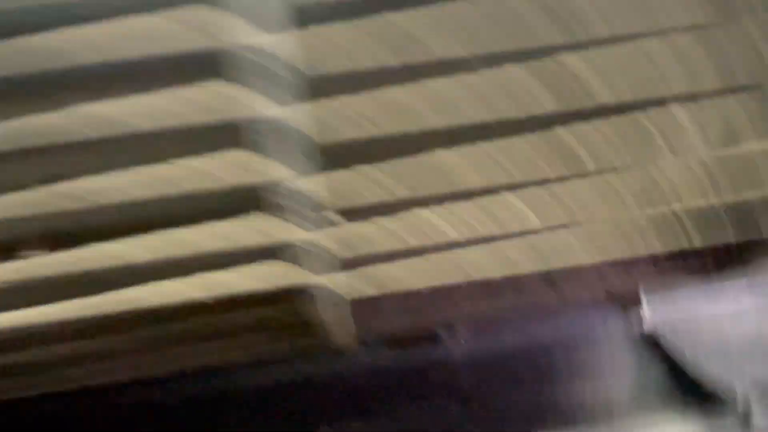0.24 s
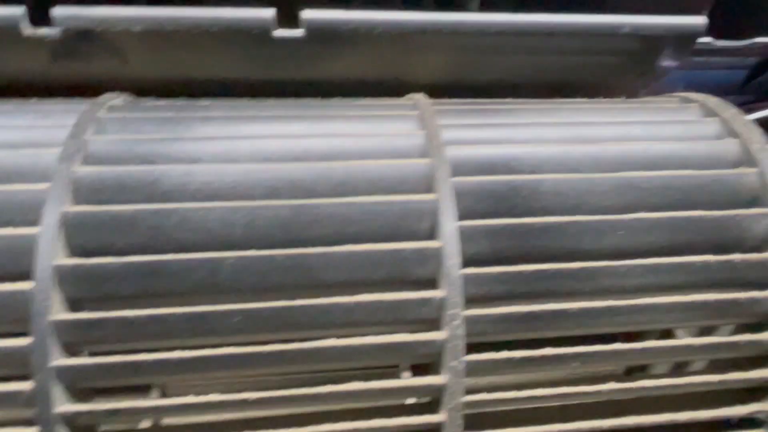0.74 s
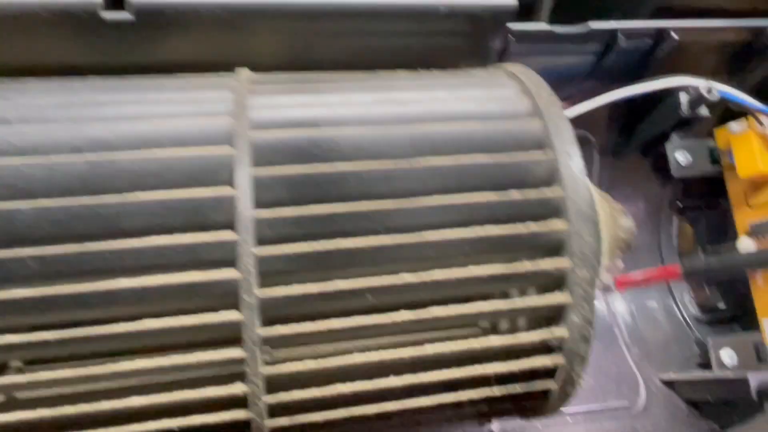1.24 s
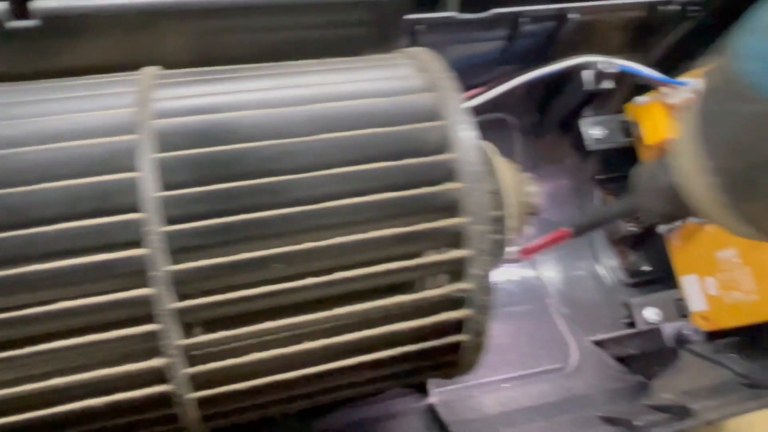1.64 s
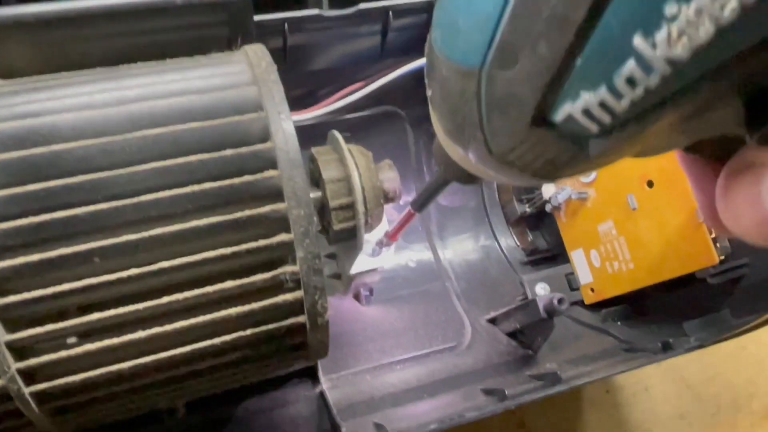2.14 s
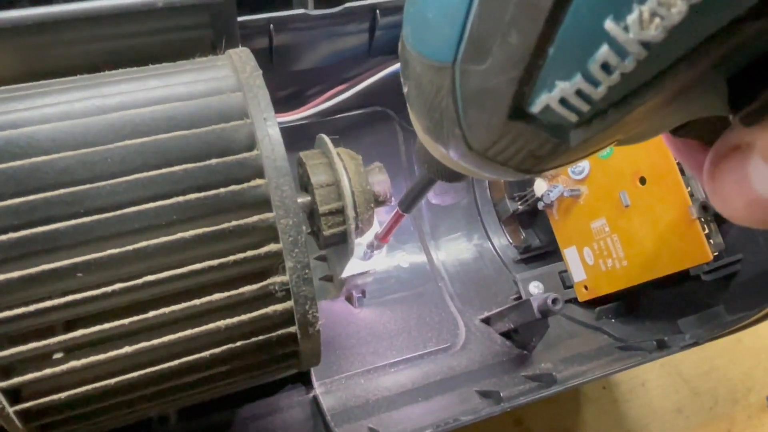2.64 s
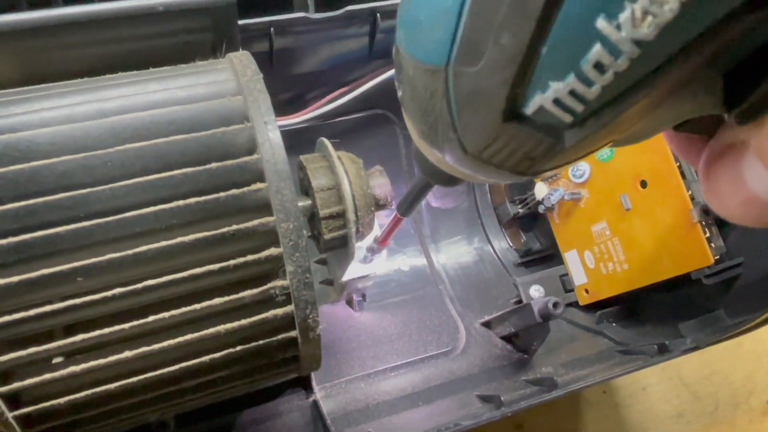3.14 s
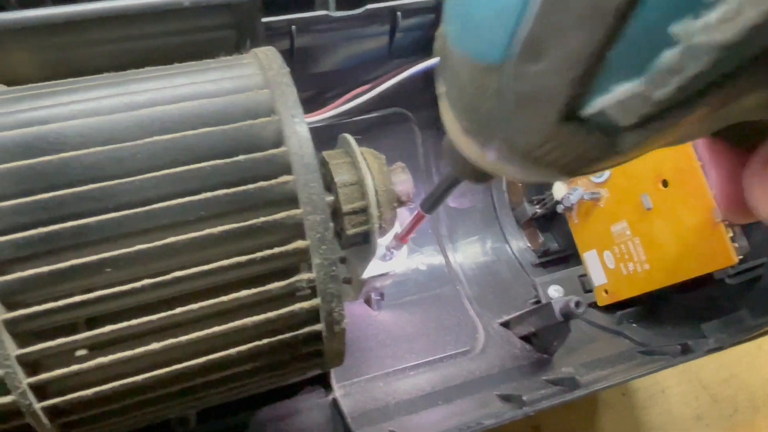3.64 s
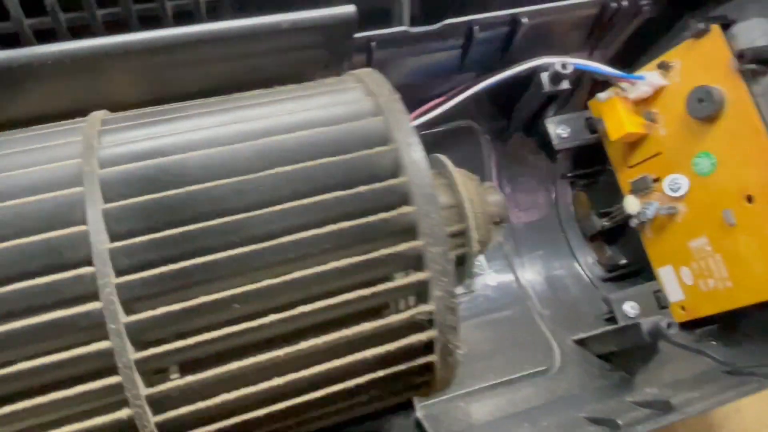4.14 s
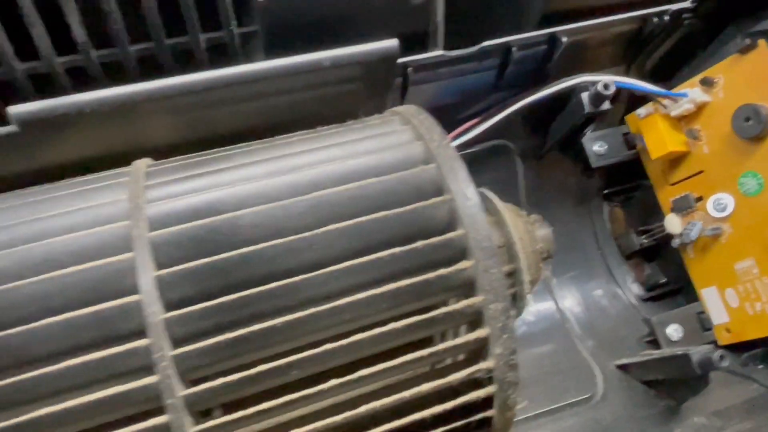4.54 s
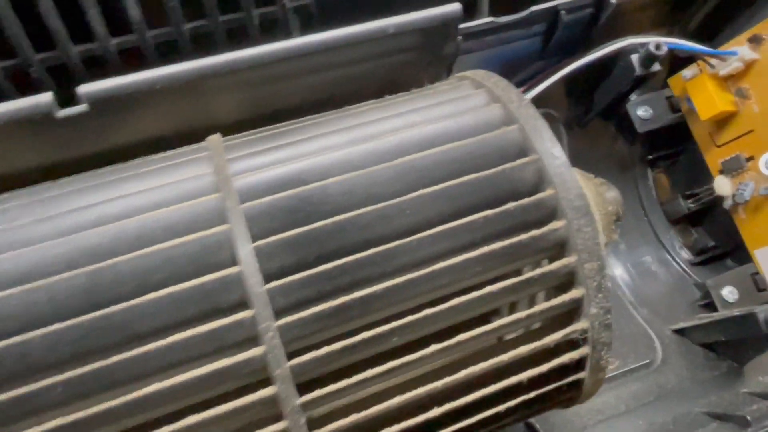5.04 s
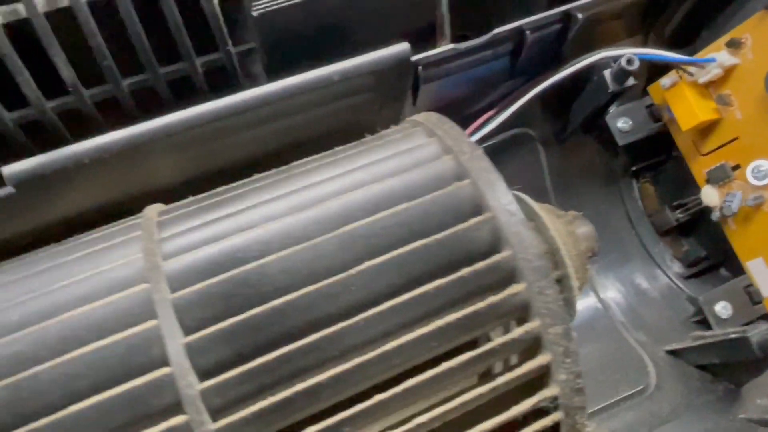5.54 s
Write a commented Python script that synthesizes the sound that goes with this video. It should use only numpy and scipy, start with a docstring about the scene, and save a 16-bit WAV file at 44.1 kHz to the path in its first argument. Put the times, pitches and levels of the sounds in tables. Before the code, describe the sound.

A fan housing is worked on at a bench, heard closely in stereo weighted left with a short, faint room response. It starts hushed, then a cluster of plastic taps arrives, sharpest midway through the second second. Tiny ticks precede a brief raspy motor burst and a few knocks. Soft rubbing leads into heavy, bassy clunks, scraping and hissy rustle, much louder than before.

```python
"""Quiet handling opens the scene; clicks and knocks from fingers and a screwdriver bit on a plastic fan
housing follow from about one second, with low bench booms, a brief cordless driver, rustle and rubbing.
Place: a bench in a small room; distance: close; microphone: a stereo pair of ports, nearly all leaning left.
Contacts are noise bursts through damped shell modes, booms are decaying sines, the driver is
sines and throbbing noise, and handling is shaped noise; the room answers contacts and driver."""
import sys
import numpy as np
from scipy import signal
from scipy.fft import rfft, irfft, next_fast_len
from scipy.io import wavfile
from scipy.ndimage import map_coordinates

SR = 44100
rng = np.random.default_rng(int(sys.argv[2]) if len(sys.argv) > 2 else 0)


def wav_out(sig):
    """Save sig, one row per channel (or a flat mono array), as 16-bit PCM at SR to the path in sys.argv[1]."""
    wavfile.write(sys.argv[1], SR, np.round(np.clip(np.atleast_2d(sig).T, -1, 1) * 32767).astype(np.int16))


N = 255912

# Contacts on the shell: t/s, peak level/dB around 850 Hz, weight/dB (380 Hz over that level),
# crack/dB (2.2 kHz over it), hardness/dB (4.9 kHz click over it), contact t60/s before the band scaling,
# favoured body f/Hz, favoured crack f/Hz
CONTACTS = [(1.038, -53.5, -19.0, 19.5, 17.5, 0.044, 1230, 3360),
            (1.044, -50, -2, -1, 11, 0.022, 1290, 2970), (1.051, -35.5, -24, 3, 4, 0.044, 960, 2690),
            (1.058, -34, -23, 1, -23.0, 0.034, 1000, 2680), (1.067, -33.5, -19, -13, -33, 0.03, 910, 2710),
            (1.08, -45, -25.0, 9, 18, 0.039, 1290, 2720), (1.098, -47.0, 1.5, -2, -13, 0.022, 950, 3310),
            (1.137, -53, -18, 7.5, -6.0, 0.073, 920, 2520),
            (1.195, -63.5, -14.0, 13, 20.5, 0.045, 1380, 2700), (1.217, -58, -3, 5, -2, 0.023, 1540, 1810),
            (1.265, -58.5, -20, 19, 27.5, 0.024, 1680, 3310), (1.302, -58, -38.0, 9, 8, 0.057, 1380, 2590),
            (1.331, -34.5, -53.0, 0, -9.5, 0.094, 900, 3360), (1.344, -41, -15, -5, -12, 0.043, 890, 2490),
            (1.356, -39, -12, -1.5, -9.0, 0.031, 1230, 2820), (1.417, -53.5, -4, -3, -20, 0.075, 930, 2730),
            (1.447, -46.5, -36.0, 0, -14.0, 0.046, 940, 2830), (1.46, -46, -14, -1.0, -2, 0.092, 940, 2760),
            (1.494, -29, -24, -9.0, -7.5, 0.042, 900, 3120),
            (1.51, -20, -48, -4.5, -3.5, 0.032, 1280, 2750),
            (1.524, -29.5, -16.5, -24.0, -45.0, 0.025, 990, 2640),
            (1.561, -40.5, -4, -2.5, -3.5, 0.08, 1440, 2940),
            (1.578, -40.5, -11.5, -17, -25.0, 0.054, 660, 1810),
            (1.594, -43, -3.5, -12, -21, 0.075, 940, 2720),
            (1.675, -44.5, -20, -13.0, -22, 0.025, 730, 2380),
            (1.689, -47.5, -21, -12, -26.0, 0.033, 910, 2450),
            (1.703, -45, -25, -19.0, -26.0, 0.022, 664, 2760), (1.9, -55, -5.5, -2, -12, 0.014, 1340, 1820),
            (1.993, -48, -12, -6, -6.5, 0.0054, 855, 1800),
            (2.489, -53.5, -13.5, -14, -32.5, 0.016, 870, 1810),
            (2.513, -56.5, -15, 1.5, 2.5, 0.053, 900, 2500), (2.54, -53.5, -8, 2, -7, 0.011, 810, 2140),
            (2.588, -56, -4, 0, -7, 0.031, 840, 4150), (2.662, -52, -36.0, 5.5, -5, 0.048, 950, 2130),
            (2.712, -56.5, -10.5, -3, -16, 0.014, 1050, 2020),
            (2.808, -51.5, -40, 7.5, 0, 0.072, 950, 2070), (2.82, -53, -41, 3, 4.5, 0.02, 950, 1800),
            (2.956, -60, -32, 8, 6, 0.018, 1580, 1870), (2.982, -40.5, -20.0, 6.5, 7, 0.023, 740, 2050),
            (2.993, -31, -29, -3, 4.5, 0.083, 1300, 2200), (3.192, -19.5, -24, -9, 6, 0.044, 780, 3720),
            (3.42, -38.5, -5.5, 0, 3, 0.012, 1000, 2100), (3.441, -55.5, 5, 10, 11, 0.033, 915, 2160),
            (3.569, -47, -5.5, -0.5, -7.5, 0.018, 870, 1810),
            (3.608, -48.5, -7, -9, -25.0, 0.028, 730, 2950),
            (3.616, -52.5, -20, 12, 10.5, 0.036, 760, 1940), (3.625, -34.5, -15, -9, -9, 0.075, 670, 2700),
            (3.639, -41.5, -7.5, 12.5, 5.5, 0.014, 630, 3070),
            (3.659, -50.5, 1.5, 10, 11.5, 0.031, 1130, 2780), (3.694, -43, -5, -4, 0, 0.029, 950, 2920),
            (3.703, -35.5, -9.5, -4.5, -9, 0.02, 700, 2940),
            (3.718, -38, -3, -4.5, -13.5, 0.097, 800, 2260), (3.75, -34, -2, -10, -27.0, 0.023, 620, 2660),
            (3.761, -45, -6, -25.0, -31.0, 0.028, 645, 2720), (3.976, -57, 0, 3.5, 0, 0.059, 700, 2260),
            (4.398, -61, 8, -8.0, -21, 0.051, 1420, 3350), (4.47, -12, -7.5, -11, -13, 0.038, 1460, 2100),
            (4.481, -14.5, -3.5, 4.0, -3, 0.031, 1490, 3340), (4.491, -26, 11.5, 7, 6, 0.039, 580, 2150),
            (4.512, -34.5, -3, 10.5, -2, 0.034, 874, 2020),
            (4.663, -38.5, 12.5, 2.5, -11.5, 0.019, 1480, 1930),
            (4.686, -46.5, 22.5, -14, -20, 0.062, 563, 1870),
            (4.705, -41.5, 16.0, -2.0, -10.0, 0.018, 740, 2090),
            (4.768, -37.5, 6, -9, -27, 0.038, 1070, 1960), (4.777, -24, -9, -3, -26, 0.025, 1420, 2130),
            (4.784, -23.5, 9, 11.5, -9, 0.024, 1500, 2010), (4.817, -45, 1.0, -4.0, -17, 0.065, 780, 1820),
            (4.86, -52, 12, 5, -13, 0.18, 580, 2140), (4.904, -56.5, 19, 6.0, -2, 0.056, 620, 1880),
            (5.019, -10.5, 6, -2, -7, 0.027, 694, 1800), (5.033, -21, 7.5, -12.5, -11, 0.031, 720, 1820),
            (5.047, -33.5, 5, 15, 1.5, 0.055, 1680, 2400), (5.066, -27, -5.0, 0, -9, 0.017, 740, 2450),
            (5.097, -10.0, -6.0, -4.5, -13, 0.029, 880, 2100),
            (5.106, -14.5, -11, 0, -11, 0.022, 870, 2080), (5.121, -29.5, 12.5, -31, -2.5, 0.11, 660, 2080),
            (5.145, -8.5, -5, -6.5, -11.5, 0.024, 1510, 1990),
            (5.161, -33, 11, -22.0, -12.0, 0.081, 600, 2050), (5.176, -38, 18, -19.0, 0, 0.02, 690, 1830),
            (5.215, -26, 6, -8, -20, 0.015, 670, 1800), (5.229, -44.5, 20.5, 13, -2, 0.022, 580, 2160),
            (5.307, -48, 4, 1, -6, 0.014, 580, 1980), (5.325, -45.5, 15.5, -9, -2.0, 0.035, 735, 2270),
            (5.389, -41.5, 17, -22.0, -36, 0.049, 675, 2050), (5.445, -63, 16, 6, -8.0, 0.041, 1070, 2100),
            (5.468, -62, 17.5, -5, -10, 0.038, 580, 2070), (5.546, -48, 7.0, -1, -7, 0.043, 580, 1870),
            (5.612, -72, 31.5, 2, -16.0, 0.038, 1170, 2060),
            (5.655, -44.5, 12.5, -13, -30, 0.056, 570, 2030)]
# Shell modes: f/Hz before detuning, level/dB struck near the bit, level/dB struck at the far end, t60/s
SHELL_MODES = [(175.3, 3.5, -4.5, 0.076), (256.8, 0, -2, 0.076), (380.8, -0.5, 7, 0.028),
               (473, -4.5, -9, 0.046), (672.6, 2.5, -6, 0.031), (827, 1.5, -3, 0.11), (944, 6, 2.5, 0.037),
               (1306, 3.5, -1, 0.023), (1535, -3, 1, 0.016), (1804, 0, -13, 0.024), (2135, -6, 1.5, 0.0078),
               (2734, -1, -6, 0.018), (3390, -2.5, -1.5, 0.0073), (4570, -6, -6, 0.012),
               (5260, -1, -7.5, 0.012), (6090, -0.5, -4, 0.0037), (8860, 0.5, -0.5, 0.0021),
               (12100, -25, -28, 0.012)]
# Centres of the contact bands, with one outer neighbour at each end: f/Hz
BANDS_HZ = [60, 170, 380, 850, 2200, 4900, 10000, 17000]
# Top band against the click, level/dB: steel bit, then hands
TOP_DB = (-5.5, -12.5)
# Driver: t/s, motor tone f/Hz, tone level/dB, gear growl level/dB, gear rasp level/dB, casing ring level/dB
DRIVER = [(2.98, 403.4, -51, -71, -47, -42), (2.996, 401.4, -49, -33, -43, -37.5),
          (3.006, 405, -36, -50, -43.5, -46), (3.036, 400.6, -40.5, -39, -32.5, -42),
          (3.072, 386.4, -44, -38, -32, -46), (3.11, 376.2, -47, -38.5, -29.5, -39.5),
          (3.156, 380.5, -53, -36, -29, -29), (3.18, 377.8, -46, -33.5, -27, -47),
          (3.214, 373.6, -55, -38.5, -28.5, -45), (3.28, 383, -40.5, -36.5, -31.5, -39),
          (3.3, 380.3, -42, -39, -31, -39), (3.326, 391.9, -38, -36, -32.5, -26.5),
          (3.36, 391.3, -38, -35.5, -31, -43), (3.404, 393.7, -39, -36.5, -36.5, -33.5),
          (3.44, 363, -81, -49, -61, -60)]
# Gear-train partials: multiple of the tone f, mean level/dB against the growl, phase waver/rad
PARTIALS = [(.5, -9, .5), (2, -11, 1.1), (2.5, -14, 1.3), (2.799, -12, .7), (3, -7.5, .4)]
# Low gear noise: f/Hz, relative level/dB per Hz
GROWL = [(88, -59), (150, -15), (254, -6), (341, -48), (383, -34), (534, -10.5), (774, -2), (1100, -7.5),
         (1450, -7), (2200, -15), (4000, -120)]
# Gear rasp: f/Hz, relative level/dB per Hz
RASP = [(700, -64), (1450, -3.5), (2000, -4), (3400, -3), (4050, 3.5), (4400, 2), (4700, 0), (5200, -7),
        (6910, -7), (7920, -92), (8400, -6), (9440, -7), (11400, -16.5), (14300, -23.5), (16400, -84)]
# Driver casing resonances: f/Hz, width/Hz, relative level/dB
CASING = [(2134, 120, -0.5), (2430, 84, -4), (2790, 160, -2.5)]
# Stereo balance of the driver: f/Hz, left over right level/dB
DRIVER_LEAN = [(60, 1), (180, -2.5), (550, 3.5), (1650, 1.5), (4970, 4.5), (8800, 0)]
# Bench booms: t/s, strength level/dB before rise and decay, f/Hz
BOOMS = [(1.053, -30, 173.7), (1.059, -28, 74.7), (1.085, -28.5, 72), (1.094, -41, 127.3),
         (1.364, -33.5, 77), (1.53, -20, 69.5), (1.612, -25.5, 70.8), (2.079, -42.5, 57.4),
         (2.216, -50, 141), (2.55, -42, 69), (3.202, -33, 64.6), (3.549, -36.5, 60.3), (3.707, -30.5, 82),
         (3.736, -22.5, 74.5), (4.496, -8.5, 59.4), (4.683, -11.5, 69.5), (4.717, -18.5, 73),
         (4.785, -19.5, 93.4), (5.03, -0.5, 65), (5.082, -14, 64), (5.127, -18, 68.5), (5.185, -4, 69.8),
         (5.328, -18, 64.9), (5.403, -44, 66), (5.466, -20.5, 78), (5.608, -22, 71.8)]
# Handling in two stretches, joined in time: t/s, rumble level/dB, rustle level/dB, hiss level/dB
HANDLING = [
    [(0, -68, -68, -74), (.11, -78, -70, -73.5), (.31, -64, -63.5, -76), (.59, -73, -74, -80.5),
     (.84, -82, -77.5, -84.5), (1.03, -88, -72.5, -83), (1.1, -53, -68.5, -77), (1.4, -61, -68.5, -82),
     (1.56, -48, -62, -75.5), (1.9, -58, -64.5, -71), (2.14, -66, -72, -80), (2.95, -62.5, -72, -83.5)],
    [(3.47, -52, -67.5, -79), (3.74, -42, -65, -74), (4.1, -61, -61, -70.5), (4.3, -67, -59.5, -54),
     (4.46, -55, -56.5, -70), (4.68, -32, -62, -73.5), (4.85, -43, -65.5, -72), (5.08, -55, -56.5, -70),
     (5.19, -24, -51, -54.5), (5.32, -32.5, -62, -62.5), (5.47, -26.5, -52.5, -61), (5.57, -35, -61.5, -70),
     (5.8, -35, -50, -53)],
]
# Low scrape of the shell on the bench: t/s, level/dB
SCRAPING = [(0, -68), (.12, -67), (.3, -52), (.42, -62.5), (.6, -79.5), (1.02, -78.5), (1.1, -55),
            (1.3, -66), (1.56, -59.5), (1.9, -67.5), (2.3, -69), (2.95, -70.5), (3.47, -64), (3.74, -62),
            (4.1, -63), (4.44, -61), (4.68, -43), (4.85, -37), (5.08, -65), (5.19, -38), (5.32, -44.5),
            (5.47, -38.5), (5.57, -40.5), (5.8, -46)]
# Rumble of the bench: f/Hz, relative level/dB per Hz
RUMBLE = [(12, -58), (20, -33), (44, -3), (65, 8.5), (79, 3.5), (108, -11), (200, -22), (260, -33),
          (440, -120)]
# Scrape of the shell: f/Hz, relative level/dB per Hz
SCRAPE = [(59, -48), (100, 6), (270, -11), (376, -11), (477, -17), (612, -26), (900, -33), (1170, -72),
          (1980, -120)]
# Rustle of the housing: f/Hz, relative level/dB per Hz
RUSTLE = [(290, -11), (500, -9.5), (613, -7.5), (735, -5.5), (1010, -5), (1640, -9), (2310, -7.5),
          (5160, -14.5), (6700, -15), (7500, -36), (9750, -54), (16500, -120)]
# Fine handling hiss: f/Hz, relative level/dB per Hz
HISS = [(4410, -10.5), (7500, -4), (9670, -8.5), (12800, -20), (13800, -12), (14100, -25), (16000, -26)]
# Rubbing band, rising unevenly and then falling: t/s, centre f/Hz, level/dB
RUB = [(3.84, 800, -83), (3.9, 929, -70), (4.09, 880, -66.5), (4.32, 1250, -67), (4.42, 1156, -73),
       (4.47, 970, -78)]
# Room decay: f/Hz, t60/s
ROOM = [(200, 0.61), (2000, 0.24), (10000, 0.12)]
# Left port's lead for contacts near the screwdriver bit: f/Hz, phase/rad
PORTS_BIT = [(0, 0), (1030, 0.4), (1810, -2.3), (2410, -0.6), (3010, 0.9), (3700, -0.4), (5340, 0.9),
             (5600, -1.5), (6290, -2.6), (8100, -3.4), (9820, -5.8), (12100, -6.6), (13600, -9.3),
             (16000, -9.6)]
# Left port's lead for the shell: f/Hz, phase/rad
PORTS_SHELL = [(0, 0), (430, -0.3), (950, -2.8), (1290, -1.5), (2930, -3.9), (3190, -3.4), (4480, -6.0),
               (5340, -6.1), (6200, -8.8), (8180, -9.7), (9730, -12.2), (12400, -12.9), (13800, -15.7),
               (16000, -15.7)]
# Left port's lead for the driver: f/Hz, phase/rad
PORTS_DRIVER = [(0, 0), (340, -5.4), (600, -4.3), (1460, -8.5), (2930, -5.3), (3620, -2.2), (3960, -4.7),
                (5510, -0.4), (6200, -2.5), (8180, -3.4), (9820, -6.3), (12900, -6.3), (13300, -9.4),
                (16000, -9.4)]

PUT_DOWN_S = 4  # from here on the hands work at the far end of the shell
THUMP_DB = (2, -10)  # 170 Hz thump over the weight: steel bit, then hands
SPOT_DB, SPOT_SPREAD = 9.5, 0.096  # boost of modes near a favoured pitch; nearness in natural log frequency
MODE_PHASE_SPREAD = 0.62  # rad, random phase gap of each mode between the sides
MODE_BYPASS = 0.3  # share of the chatter that bypasses the modes
RATTLE_DB, RATTLE_T60_S = -29.5, 0.17  # drive of the loose parts against the blow; t60 before band scaling
RATTLE_BLUR, RATTLE_SHARED = 2.97, 0.29  # mode widening; share of the drive heard alike on both sides
LEAN_DB, LEAN_SCATTER_DB = 6, 3  # contacts' left over right and its spread, before the band shares
BOOM_T60_S, BOOM_RISE_S = 0.24, 0.0054  # t60 at 70 Hz; higher booms die sooner in proportion
SHUDDER_DB, SHUDDER_T60_S = -11.5, 0.28  # rough rumble left by each boom, against its strength
RUB_HALF_WIDTH_HZ = 160
TOP_HZ = 16400  # band limit of the microphone


def amp(db):
    """dB to gain."""
    return 10 ** (np.asarray(db) / 20)


def unit(x):
    """Scale to rms 1."""
    return x / np.sqrt(np.mean(x ** 2) + 1e-20)


def along(points, hz):
    """Read (f/Hz, value) points on a log frequency axis."""
    f, value = np.transpose(points)
    return np.interp(np.log(hz + 1), np.log(f + 1), value)


def curves(rows):
    """Give one value per sample for each column after the time."""
    s, *columns = np.transpose(rows)
    return [np.interp(np.arange(N) / SR, s, column) for column in columns]


def wobble(rate):
    """Make a smooth random curve with rate knots a second."""
    knots = rng.standard_normal(int(N * rate / SR) + 4)
    return map_coordinates(knots, [np.arange(N) * rate / SR])


def filtered(x, response):
    """Multiply the spectrum of x by a response of frequency."""
    m = next_fast_len(x.shape[-1] + 8192)
    return irfft(rfft(x, m) * response(np.fft.rfftfreq(m, 1 / SR)), m)[..., :x.shape[-1]]


def coloured(x, spectrum):
    """Shape x by a spectrum, then scale it to rms 1."""
    return unit(filtered(x, lambda hz: amp(along(spectrum, hz))))


def pair_of(shared):
    """Make stereo white noise, with a share of its power common to both sides."""
    common, left, right = rng.standard_normal((3, N))
    return np.sqrt(shared) * common + np.sqrt(1 - shared) * np.array([left, right])


def ports(pair, lead):
    """Let the two microphone ports hear one source with a frequency-dependent phase gap."""
    f, radians = np.transpose(lead)
    return filtered(pair, lambda hz: np.exp(.5j * np.outer([1, -1], np.interp(hz, f, radians))))


def contacts():
    """Drive the shell's damped modes with grainy chatter; weight fills the bass, hardness the treble."""
    out, t = np.zeros((2, N + SR)), np.arange(SR // 5) / SR
    f = np.fft.rfftfreq(len(t), 1 / SR)
    # six crossfading bands: thump, weight, body, crack, click, top
    hats = np.array([along(np.transpose([BANDS_HZ, hat]), f) for hat in np.eye(8)[1:7]])
    bands = np.sin(np.pi / 2 * hats) ** 2
    mode_hz, *mode_db, mode_t60 = np.transpose(SHELL_MODES)[:, :, None]
    width = np.log(1000) / (np.pi * mode_t60)
    lead = .01  # s of room ahead of the onset for the band filters
    late = np.clip(t - lead, 0, None)

    for s, db, weight_db, crack_db, hard_db, contact, *favoured_hz in CONTACTS:
        far = int(s > PUT_DOWN_S)
        # the level of the noise jumps every 32 samples
        grain = amp(4 * rng.standard_normal(len(t) // 32 + 1)).repeat(32)[:len(t)]
        chatter, *loose = rng.standard_normal((3, len(t))) * grain
        loose = np.sqrt(RATTLE_SHARED) * chatter + np.sqrt(1 - RATTLE_SHARED) * np.array(loose)

        # the contact softens as it settles, so the treble of the chatter dies first
        settle = max(contact, .004) * np.array([[1.2], [1.15], [1.05], [.9], [.75], [.6]])
        rattle = RATTLE_T60_S * np.array([[1.1], [1.1], [1.05], [.6], [.45], [.4]])
        rise = 1 - np.exp(-late / (0.012 * settle))

        # the grip detunes the shell and shifts its mode levels a little differently each time
        hz = mode_hz * rng.normal(1, .015, mode_hz.shape)
        grip_db = rng.normal(0, 2, hz.shape)
        nearness = np.exp(-(np.log(mode_hz / favoured_hz) / SPOT_SPREAD) ** 2)
        spot = nearness.sum(1, keepdims=True)
        gap = MODE_PHASE_SPREAD * rng.standard_normal(hz.shape) * np.reshape([.5, -.5], (-1, 1, 1))
        sign = rng.choice([-1, 1], hz.shape)
        strength = amp(mode_db[far] + grip_db) * sign * np.exp(1j * gap)

        def shell(w, boost):
            """Response of all modes plus the bypass, for each side and band."""
            modes = boost * strength * 1j * f * w / (hz * hz - f * f + 1j * f * w)
            return (modes.sum(1) + MODE_BYPASS)[:, None] * bands

        blow_drive = chatter * amp(-60 * late / settle) * rise
        blow = irfft(rfft(blow_drive) * shell(width, amp(SPOT_DB * spot)), len(t))
        # loose parts rattle on after each contact
        tail_drive = loose[:, None] * amp(RATTLE_DB - 60 * late / rattle) * rise
        tail = irfft(rfft(tail_drive) * shell(RATTLE_BLUR * width, 1), len(t))
        parts = (blow + tail) / np.abs(blow).max(-1, keepdims=True)

        levels = db + np.array([weight_db + THUMP_DB[far], weight_db, 0,
                                crack_db, hard_db, hard_db + TOP_DB[far]])
        # the weight and top bands spread most evenly
        lean_shares = np.array([0.61, 0.057, 0.3, 0.7, 0.74, 0.0193])
        lean_db = rng.normal(LEAN_DB, LEAN_SCATTER_DB) * lean_shares
        gains = amp(levels + np.outer([.5, -.5], lean_db))
        out[:, round((s - lead) * SR):][:, :len(t)] += (gains[..., None] * parts).sum(1)
    return out[:, :N]


def driver():
    """Sum a motor tone, gear noise throbbing at half the tone's rate, and casing ring in swells."""
    hz, tone_db, growl_db, rasp_db, ring_db = curves(DRIVER)
    t = np.arange(N) / SR
    start = np.clip((t - DRIVER[0][0]) / 0.00082, 0, 1)
    stop = np.clip((DRIVER[-1][0] - t) / 0.03, 0, 1)
    turn = 2 * np.pi * np.cumsum(hz) / SR
    tone = np.sqrt(2) * np.sin(turn)
    # the other partials come from the gear train, so they grow with its growl
    partials = np.sqrt(2) * sum(amp(db + 3.5 * wobble(18)) * np.sin(k * turn + waver * wobble(45))
                                for k, db, waver in PARTIALS)
    throb = 1 + 0.21 * np.cos(turn / 2 + 0.33 * wobble(40))
    teeth = throb * amp(0.72 * wobble(130))
    growl = coloured(pair_of(0.44) * teeth, GROWL)
    rasp = coloured(pair_of(0.72) * teeth, RASP)

    def casing(f):
        """Sum of the casing resonances."""
        return sum(amp(db) / (1 + (2 * (f - centre) / w) ** 2) for centre, w, db in CASING)

    ring = unit(filtered(pair_of(0.68) * teeth, casing))
    whir = amp(tone_db) * tone + amp(growl_db) * (growl + partials)
    whir = start * stop * (whir + amp(rasp_db) * rasp + amp(ring_db) * ring)
    leaning = filtered(whir, lambda f: amp(np.outer([.5, -.5], along(DRIVER_LEAN, f))))
    return ports(leaning, PORTS_DRIVER)


def bench():
    """Swing the bench top at a low mode, building up over about a cycle, and let it shudder on."""
    boom, shake, t = np.zeros(N + SR), np.zeros(N + SR), np.arange(SR // 2) / SR
    rise = (1 - np.exp(-t / BOOM_RISE_S)) ** 2
    for s, db, hz in BOOMS:
        at = round(s * SR)
        swing = amp(db - 60 * t * hz / (70 * BOOM_T60_S)) * rise
        boom[at:][:len(t)] += swing * np.sin(2 * np.pi * hz * t)
        shake[at:][:len(t)] += amp(db + SHUDDER_DB - 60 * t / SHUDDER_T60_S) * rise
    shudder = shake[:N] * coloured(pair_of(0.94), RUMBLE)
    return (boom[:N] + shudder) * amp([[1.5], [-1.5]])  # leaning left


def handling():
    """Slide and grip the housing: lumpy bench rumble, low shell scrape, rustle and fine hiss."""
    rumble_db, rustle_db, hiss_db = curves(np.vstack(HANDLING))
    scrape_db, = curves(SCRAPING)
    lumps_db, grain_db = 3 * wobble(14), wobble(20)
    rumble = amp(rumble_db + lumps_db) * coloured(pair_of(0.95), RUMBLE)
    scrape = amp(scrape_db + 2.5 * wobble(25)) * coloured(pair_of(0.39), SCRAPE)
    rustle = amp(rustle_db + grain_db + 0.78 * wobble(160)) * coloured(pair_of(0.02), RUSTLE)
    hiss = amp(hiss_db + grain_db) * coloured(pair_of(1.0), HISS)
    return (rumble + ports(scrape + rustle + hiss, PORTS_SHELL)) * amp([[1.2], [-1.2]])  # leaning left


def rub():
    """Carry slow noise on a drifting sine: a narrow friction band whose pitch moves as the shell slides."""
    hz, db = curves(RUB)
    t = np.arange(N) / SR
    noise = np.array([wobble(RUB_HALF_WIDTH_HZ * 2), wobble(RUB_HALF_WIDTH_HZ * 2)])
    band = noise * np.sin(2 * np.pi * np.cumsum(hz) / SR)
    return amp(db) * unit(band) * ((t > RUB[0][0]) & (t < RUB[-1][0]))


def room(x):
    """Answer with noise dying at its own speed at each frequency; the tail is new every quarter second."""
    out, step = np.zeros((2, N + SR)), SR // 4
    for at in range(0, N, step):
        hz, t, z = signal.stft(rng.standard_normal((2, SR // 3)), SR, nperseg=256)
        decay = amp(-60 * t / along(ROOM, hz)[:, None])
        tail = signal.istft(z * decay, SR, nperseg=256)[1]
        wet = signal.fftconvolve(x[None, at:at + step], tail / np.linalg.norm(tail[0]), axes=1)
        out[:, at + 128:][:, :wet.shape[1]] += wet  # 128 samples behind the direct sound
    return out[:, :N]


def scene():
    """Mix all sources, with the room answering the left side of the contacts and the driver."""
    knocks, whir = contacts(), driver()
    early = np.arange(N) < PUT_DOWN_S * SR
    direct = ports(knocks * early, PORTS_BIT) + ports(knocks * ~early, PORTS_SHELL) + whir
    answer = amp(-19.5) * room(knocks[0] + 0.86 * whir[0])
    return direct + bench() + handling() + rub() + answer


def record(dry):
    """Lose the deepest bass, round off the hardest peaks and keep nothing above the microphone's limit."""
    thin = filtered(dry, lambda hz: (1j * hz / (1j * hz + 25)) ** 4)
    rounded = thin / (1 + np.abs(thin / .95) ** 6) ** (1 / 6)
    return filtered(rounded, lambda hz: hz < TOP_HZ)


dry = scene()
out = record(dry)
wav_out(out)
```